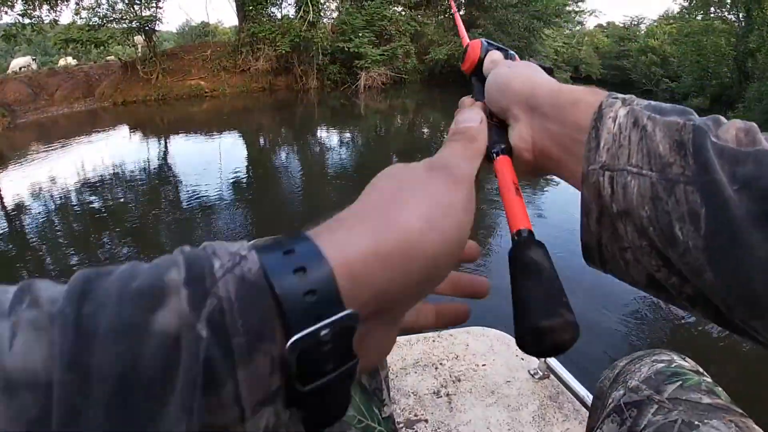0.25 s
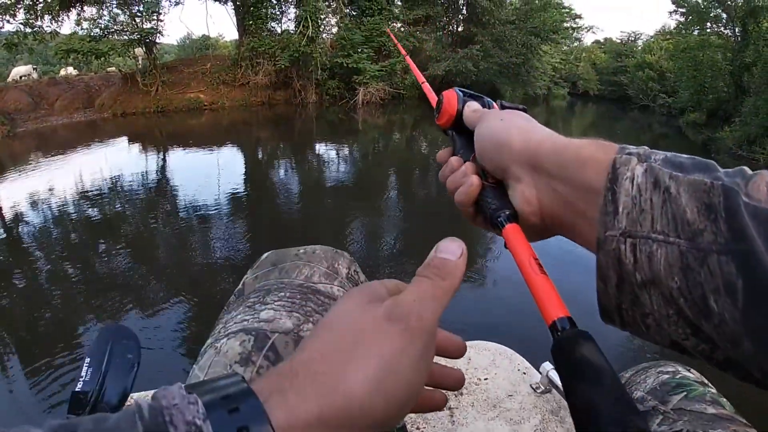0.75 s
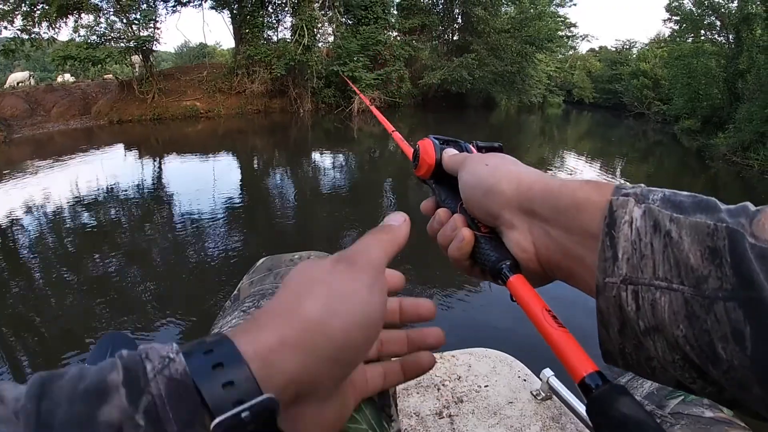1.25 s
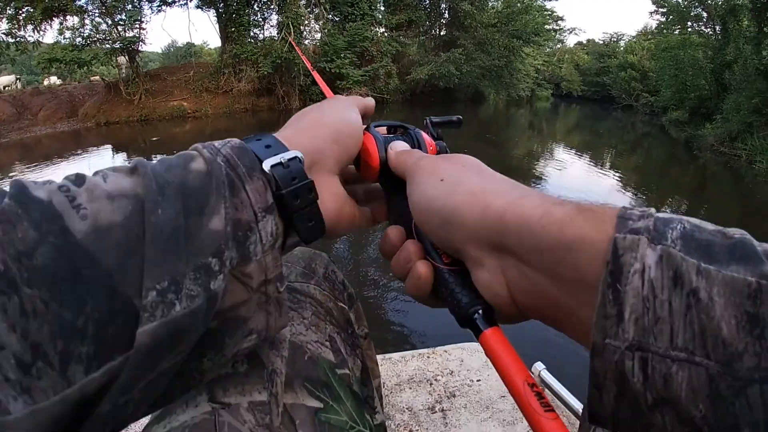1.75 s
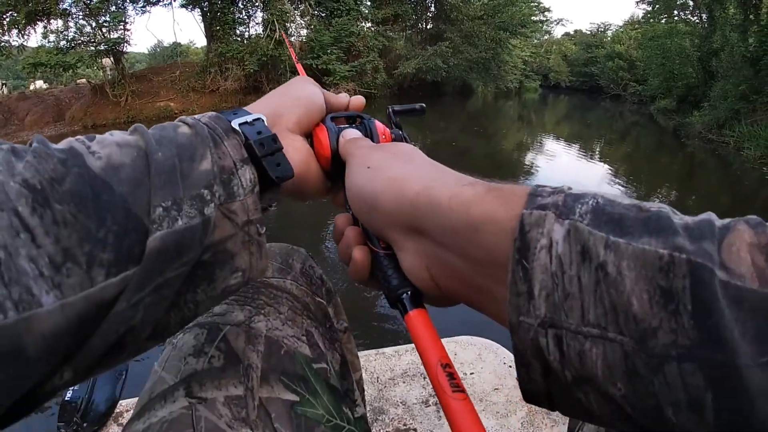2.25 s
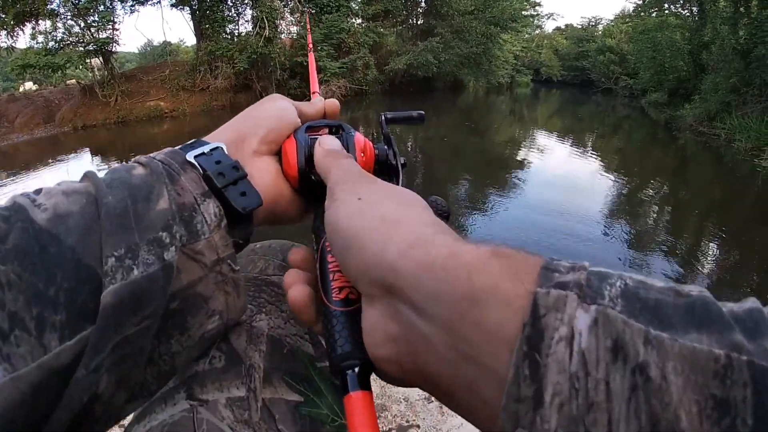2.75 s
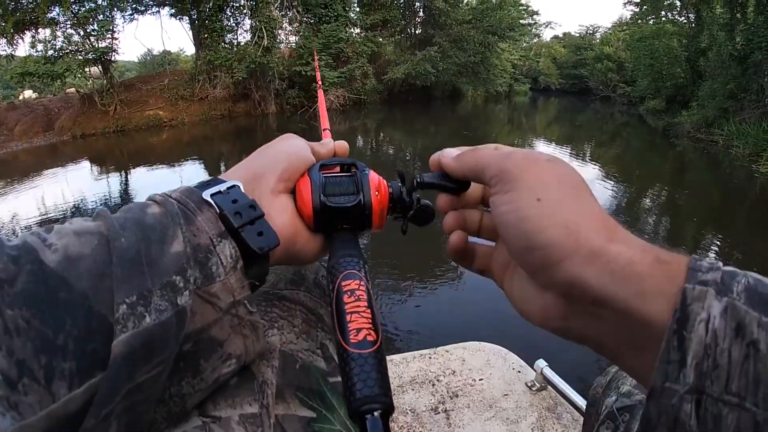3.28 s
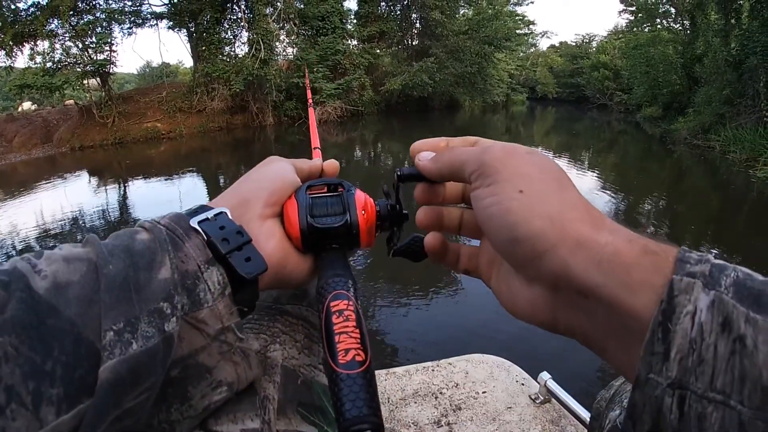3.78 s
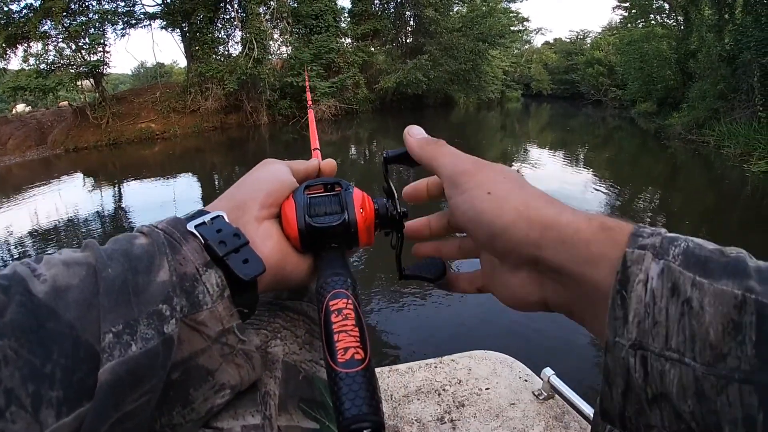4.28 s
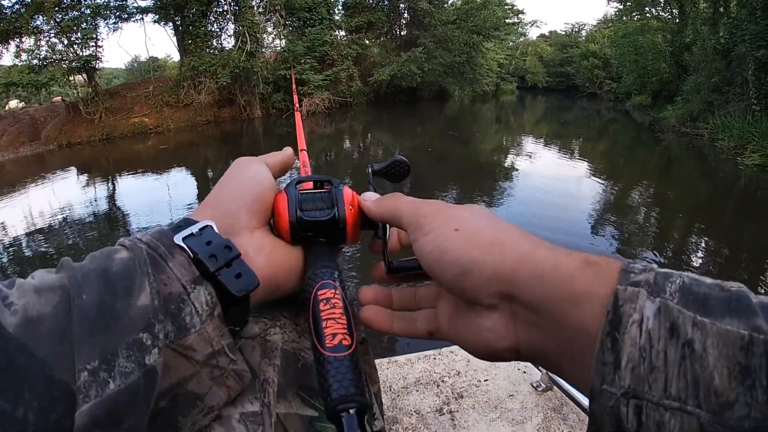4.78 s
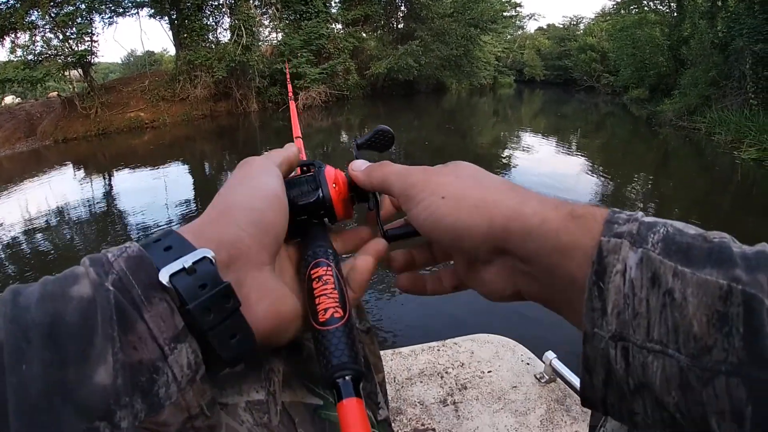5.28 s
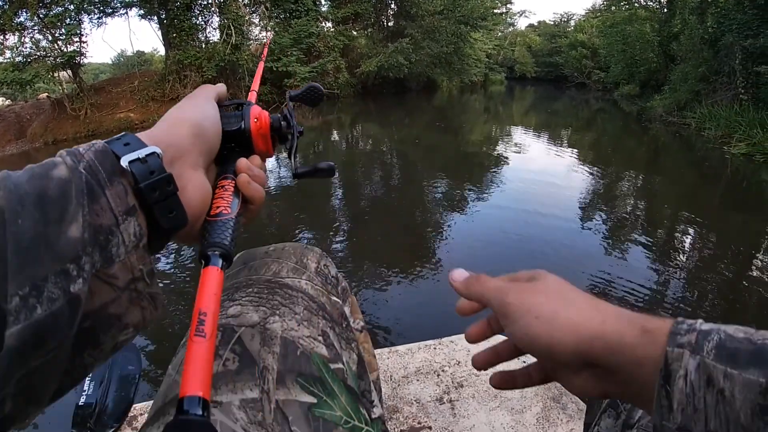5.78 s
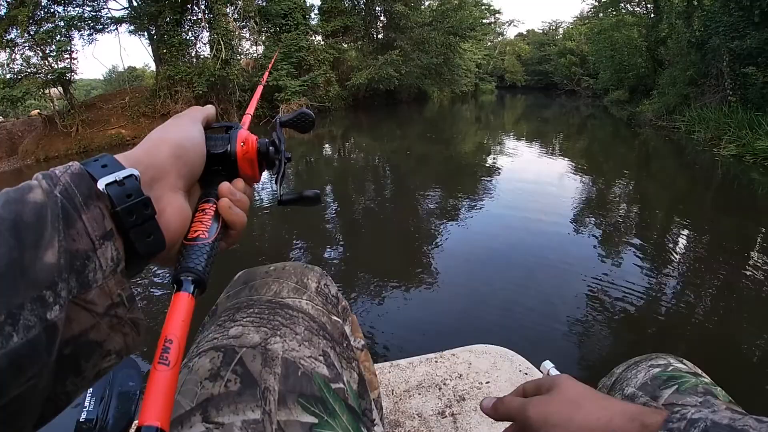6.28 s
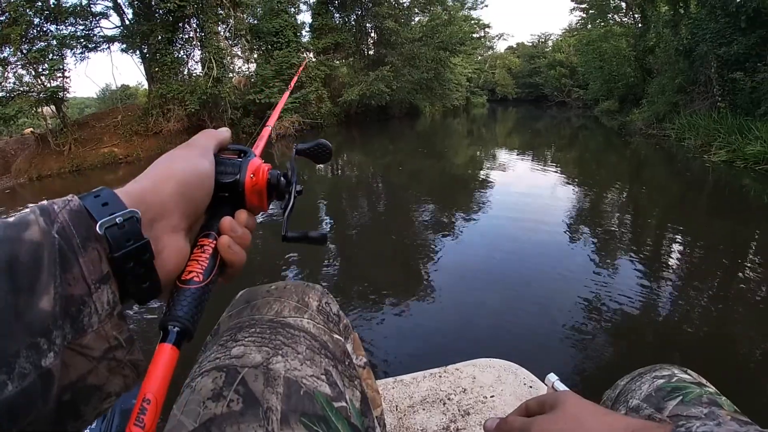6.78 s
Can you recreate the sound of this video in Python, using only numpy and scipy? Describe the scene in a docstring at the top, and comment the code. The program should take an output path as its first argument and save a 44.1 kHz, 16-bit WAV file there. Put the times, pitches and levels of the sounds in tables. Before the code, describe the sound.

A close, body-worn microphone on a small boat at a wooded pond. From 0 s line rushes off the reel in a bright, surging hiss, strongest in the first 0.15 s; the spool's whirr and whine glide down, swell into a fluttering shudder near 0.93 s and stop by 1.13 s. A light knock and short watery plop land at about 1.06 s with a faint bank echo. Soft sleeve rustles and low bumps follow, a heavier thump at 2.6 s. At 3.15 s the reel snaps with a sharp, damped metallic clack, then a cloth swish. Sparse taps come at 4.08, 5.13, 5.4 and 5.93 s. Insects hiss high throughout with a chirping cricket; far engines hum, rising and sagging, from 1.2 s. Faint slurred whistles and two rough squeaks pass at 2-4.4 s. From 5.7 s a wren rolls curved whistles six times a second, echoing until the end.

```python
"""A wooded pond, from a small boat: an angler casts, the spool whirs down as line hisses out, and the lure plops in.
Shaped noise makes the line, gliding partials the spool, and short bursts through resonances the reel's sharp clack.
Grainy noise rustles as sleeves, filtered bursts knock on the rod, and low noise thuds as the body bumps its microphone.
Insects hiss, far slurs and two rough squeaks sound, and a wren starts its rolling song: curved sines with tree echoes.
Two far engines hum: one rises and falls as sines, one drones as narrow noise."""
import sys
import numpy as np
from scipy import signal
from scipy.fft import rfft, irfft, next_fast_len
from scipy.io import wavfile
from scipy.ndimage import map_coordinates

SR = 44100
rng = np.random.default_rng(int(sys.argv[2]) if len(sys.argv) > 2 else 0)


def bounce(signal):
    """Save signal as a 16-bit WAV file at the path given by the first command-line argument."""
    frames = np.transpose(np.atleast_2d(signal))
    limited = np.clip(frames, -1, 1)
    pcm = np.round(limited * 32767).astype(np.int16)
    wavfile.write(sys.argv[1], SR, pcm)


N = 310023
TIME = np.arange(N) / SR
# the slowing spool shudders more and more, then calms and stops
SHUDDER_S, SHUDDER_RISE_S, SHUDDER_FALL_S, STOP_S = 0.935, 0.12, 0.049, 1.133


def cast(flutter=0.042, slap_db=1.33, high_ring_db=3, spray_patch_db=2):
    """Line leaves the slowing spool in surges, fluttering once a turn; the reel whines and the spool whirrs."""
    # the spool slows as the lure flies: t/s, speed/(turns per s)
    spool_speed = [(0, 159), (.1, 153.5), (.25, 142), (.4, 128), (.5, 116), (.6, 110), (.7, 103.3),
                   (.8, 91), (.855, 83.6), (.9, 81.4), (1.0, 66.5), (1.08, 56)]
    # hiss of the running line: f/Hz, level/dB
    line_colour = [(150, -29), (250, -11), (620, -20), (784, -3), (967, -29), (1300, -6), (1520, -3.5),
                   (1730, -12.5), (2050, 3.5), (2280, 3.5), (2650, -1.5), (3130, 2.5), (3750, -3.5),
                   (4500, -5), (5600, 3), (6300, -5.5), (6800, -5), (7500, -8), (9100, -23), (15400, -120)]
    # high spray above it: f/Hz, level/dB
    spray_colour = [(5000, -6.5), (6800, -12), (8000, 0.5), (9400, -9.5), (10500, -6), (11500, -18),
                    (12200, -15), (15000, -24), (16500, -50)]
    # coils whip through the guides: middle t/s, length/s, line boost/dB, spray boost/dB
    surges = [(0.042, 0.056, 5.5, 6.5), (0.137, 0.035, 4, 10.5), (0.27, 0.034, 0, 9), (0.32, 0.019, 4, 9.5),
              (.391, 0.032, 1, 12.5), (0.546, 0.077, 1, 6.5), (0.623, 0.028, 3.5, 7.5),
              (0.706, 0.056, -0.5, 5.5)]
    # one row a layer: level in free flight/dB, share of the throw's boost, boost at full shudder/dB
    line_level = (-51.5, 0.29, 8.5)
    spray_level = (-59.5, 1, 11.4)
    whine_level = (-60.5, .85, 9.5)
    # the throw pulls hard on the line, then lets it fly
    throw_s, throw_release_s, throw_boost_db = 0.17, 0.081, 13.5

    speed, = follow(spool_speed)
    throw_db = throw_boost_db * np.clip((throw_s - TIME) / throw_release_s, 0, 1)
    before = np.maximum(SHUDDER_S - TIME, 0)
    after = np.maximum(TIME - SHUDDER_S, 0)
    shudder = np.exp(-before / SHUDDER_RISE_S - after / SHUDDER_FALL_S)
    line_db, spray_db, whine_db = (
        db + share * throw_db + shudder_db * shudder
        for db, share, shudder_db in (line_level, spray_level, whine_level))
    for s, length, low_db, high_db in surges:
        surge = swell(s, length)
        line_db = line_db + low_db * surge
        spray_db = spray_db + high_db * surge
        whine_db = whine_db + 1.04 * high_db * surge

    turning = unit(1 + flutter * tone(speed)) * amp(slap_db * wander(69.8))
    line = amp(line_db) * hiss(line_colour)
    slips = colour(grains(spread_db=3.0), spray_colour)
    spray = amp(spray_db) * patchy(slips, spray_patch_db, patch_hz=500, patch_s=.025)
    whine = fuzzy(51.5 * speed * (1 + .01 * wander(45)), 520) * amp(1.8 * wander(110))
    # the whine swells as it glides through a ring of the frame
    whine = whine + amp(high_ring_db) * resonate(whine, 3400, 260)
    running = np.clip((STOP_S - TIME) / 0.11, 0, 1)
    return running * (turning * (line + spray + amp(whine_db) * whine) + whirr(speed, shudder))


def whirr(speed, shudder, flicker_db=2.0, sing_order=11, sing_hz=1300, sing_width_hz=70, sing_db=-56):
    """The spool's partials glide down through the rings of the frame; one of them sings briefly as it passes."""
    # partials, those in between on the same slope: multiple of the spool speed, level/dB
    orders = [(3, -9), (4, -4), (5, -15), (6, 0), (7, -1), (8, 0), (9, 0), (10, -9), (11, -7), (12, -8),
              (13, -16), (18, -15), (20, -7), (21, -8), (22, -4), (23, -9), (24, -4), (28, -4), (34, -10)]
    # the frame favours some pitches: f/Hz, level/dB
    frame_colour = [(300, 0), (420, -3), (520, 0), (640, -1), (770, 3), (870, -6), (980, 0), (1080, -6),
                    (1170, -2), (1290, 7), (1420, 0), (1550, 3), (1720, -5), (1850, 1), (2080, -5),
                    (2350, 5), (2600, -3), (3200, -1), (4500, -12)]
    # it sets in faintly in free flight, then grows steadily up to the shudder
    free_db, top_db, rise_db_per_s, fall_db_per_s, onset_s = -68.5, -53, 44, 230, 0.56

    out, t = np.zeros(N), TIME[TIME < STOP_S]
    n = len(t)
    rising_db = np.maximum(top_db - rise_db_per_s * np.maximum(SHUDDER_S - t, 0), free_db)
    level_db = rising_db - fall_db_per_s * np.maximum(t - SHUDDER_S, 0)
    # the spool runs nearly true until the shudder shakes it
    wobble = .003 + .028 * shudder[:n] ** 5
    hz = speed[:n] * (1 + wobble * wander(150)[:n])
    for k in range(orders[0][0], orders[-1][0] + 1):
        db = read(orders, k) + read(frame_colour, k * hz) + flicker_db * wander(60)[:n]
        out[:n] += amp(level_db + db) * tone(k * hz, rng.random())
    out *= np.minimum(TIME / onset_s, 1) ** 2
    sing_pitch = sing_order * speed
    singing = amp(sing_db) / (1 + ((sing_pitch - sing_hz) / sing_width_hz) ** 2)
    return out + singing * fuzzy(sing_pitch, 90)


def plop(splash_s=1.067, splash_db=-39, splash_t60=0.26, echo_db=-55, echo_hz=1320, echo_t60=1.7):
    """The lure lands: a light knock just before, then a few bubbles, a short splash, and a narrow echo off the banks."""
    # knock and bubbles: t/s, level/dB, f/Hz, life/s
    knock_and_bubbles = [(1.0588, -35.5, 595, 0.0034), (1.0631, -24.5, 1900, 0.00077),
                         (0.98, -39, 1000, 0.00073), (1.069, -42, 1760, 0.0027),
                         (1.0695, -40.5, 626, 0.0062), (1.069, -33.5, 3100, 0.00046),
                         (1.078, -39.5, 435, 0.0059)]
    # f/Hz, level/dB
    splash_colour = [(180, -30), (300, -11), (428, -3.5), (1470, -10.5), (1720, -3), (2690, -9.5),
                     (3180, -13), (4900, -11), (8410, -21.5), (12000, -55), (15600, -79), (22000, -120)]
    out, t = np.zeros(N), np.arange(4000) / SR
    for s, db, hz, life in knock_and_bubbles:
        pulse = t / life * np.exp(1 - t / life)
        add(out, s, amp(db) * pulse * np.sin(2 * np.pi * hz * t))
    age = np.maximum(TIME - splash_s, 0)
    splash = amp(splash_db - 60 * age / splash_t60) * np.minimum(age / 0.00091, 1)
    echo = amp(echo_db - 60 * age / echo_t60) * np.minimum(age / 0.093, 1)
    return out + splash * hiss(splash_colour) + echo * fuzzy(echo_hz, 330)


def clutch(softness_hz=12000, softer_db_per_octave=28, least_width_hz=200):
    """Each contact is a brief chatter that rings the reel's frame, kept damped by the hand; light ones are duller."""
    # the clutch snaps in: t/s, relative level/dB, burst decay/s
    contacts = [(3.1273, -32, 0.0004), (3.1324, -23.5, 0.00062), (3.1450, -35.5, 0.0012),
                (3.1503, -30.5, .0004), (3.1531, -13, 0.001), (3.1555, 3, 0.0006), (3.1574, -7, 0.0004),
                (3.1602, -17, 0.0008)]
    # resonances of the frame: f/Hz, width/Hz before the damping floor, level/dB
    frame_rings = [(540, 390, -11.5), (1445, 220, -8), (2001, 220, -6.5), (2792, 180, -2), (3220, 320, -4),
                   (4040, 220, 1), (4847, 233, 0), (5080, 270, -2.5), (5760, 300, -6.5), (6800, 200, -10.5),
                   (6910, 220, -9.5), (7200, 200, -12.5), (7810, 200, -11), (8330, 160, -10.5),
                   (8990, 150, -10.5), (12760, 800, -18.5), (14520, 1700, -23)]
    out = np.zeros(N)
    for s, db, decay in contacts:
        cutoff_hz = min(softness_hz * 2 ** (db / softer_db_per_octave), 15000)
        blow = signal.lfilter(*signal.butter(2, cutoff_hz, fs=SR), chatter(decay))
        # neighbouring resonances ring with opposite sign
        ring = sum((-1) ** k * amp(level) * resonate(blow, hz, max(width, least_width_hz))
                   for k, (hz, width, level) in enumerate(frame_rings))
        # scaled to equal energy before its level
        add(out, s - 64 / SR, amp(db) * 5 * ring / np.linalg.norm(ring))
    return out


def knocks():
    """Hand, crank and rod tap each other: band-limited contacts, dull and quickly damped."""
    # t/s, peak level/dB, centre f/Hz, spread each way/octaves, burst decay/s
    taps = [(1.522, -59, 9100, .6, .004), (2.368, -43, 2190, 0.9, 0.0032), (2.7766, -47, 394, 0.76, 0.0047),
            (3.1678, -32, 300, 0.88, 0.0046), (3.223, -39.5, 2200, 0.48, 0.0027),
            (3.3, -40, 3000, 0.68, .004), (3.6692, -52.5, 443, 0.25, 0.0057),
            (4.0763, -34, 2400, 0.46, 0.0011), (4.0767, -46, 796, 0.22, .0015),
            (4.7563, -56.5, 751, 0.63, 0.0051), (5.1337, -30, 4300, 0.42, 0.001),
            (5.341, -42.5, 606, 0.74, 0.0023), (5.402, -40, 580, 0.66, 0.0023),
            (5.919, -37, 330, 0.73, 0.0042), (5.9338, -33.5, 1190, 1, 0.0016),
            (5.9348, -33, 478, 0.41, 0.0026), (6.314, -43, 450, 0.86, 0.0074)]
    out = np.zeros(N)
    for s, db, centre, spread, decay in taps:
        edges = centre * 2. ** np.array([-spread, spread])
        tap = signal.lfilter(*signal.butter(2, edges, "bandpass", fs=SR), chatter(decay))
        add(out, s - 64 / SR, amp(db) * tap / np.abs(tap).max())
    return out


def sleeves(cloth_db=-67, grain_db=1.2, patchy_db=.8):
    """Cloth rustles in soft strokes as the arms move; bright strokes swish."""
    # a sleeve or palm slides: middle t/s, length/s, level/dB, brightness 0-1
    strokes = [(1.293, 0.17, -62.5, 0.4), (1.485, 0.22, -61, 0.2), (2.114, 0.56, -60, 0),
               (2.72, 0.14, -59.5, 0.4), (2.854, 0.12, -58.5, 0.1), (3.09, 0.08, -60.5, 0.6),
               (3.227, 0.075, -50.5, 0.5), (3.302, 0.066, -58.5, .2), (4.707, 0.13, -57.5, 0.21),
               (4.897, .14, -56.5, 0.24), (5.01, 0.08, -54, 0.5), (5.143, 0.13, -58.5, 0),
               (5.397, 0.17, -60.5, 0.6), (6.137, 1, -61.5, 0)]
    # f/Hz, level/dB
    rustle_colour = [(300, -10.5), (1200, -6), (2100, -1), (3800, 2), (5500, 0), (7800, -4.5),
                     (9500, -14.5), (12000, -27.5), (15000, -37.5)]
    # f/Hz, level/dB
    swish_colour = [(1000, -13), (3000, -5.5), (5500, -0.5), (8000, 4.5), (10000, -8.5), (13000, -20),
                    (15000, -35)]
    rub, swish = amp(cloth_db), 0
    for s, length, db, bright in strokes:
        stroke = amp(db) * swell(s, length)
        rub = rub + np.sqrt(1 - bright) * stroke
        swish = swish + np.sqrt(bright) * stroke
    rustle = rub * colour(grains(spread_db=grain_db), rustle_colour)
    return (rustle + swish * hiss(swish_colour)) * amp(patchy_db * wander(50))


def handling():
    """The moving body rumbles and thuds through the microphone it wears."""
    # the body shifts and bumps: middle t/s, length/s, rumble level/dB, thud level/dB
    bumps = [(0.047, 0.2, -34, -53), (0.178, 0.1, -48, -34), (0.335, 0.13, -41.5, -43),
             (0.673, 0.059, -32, -43.5), (1.667, 0.17, -46.5, -46.5), (1.868, 0.18, -37.5, -47.5),
             (2.084, 0.099, -30.5, -41.5), (2.427, 0.061, -34.5, -55), (2.606, 0.072, -23, -39.5),
             (2.815, 0.29, -42.5, -58), (2.954, 0.048, -41, -38), (3.073, 0.058, -36.5, -62),
             (3.253, 0.13, -40.5, -49), (3.44, 0.13, -39.5, -45), (3.631, 0.052, -30.5, -43.5),
             (4.311, 0.049, -34.5, -60.5), (4.517, 0.082, -39, -45.5), (5.026, 0.054, -35.5, -63),
             (5.275, 0.041, -35.5, -47.5), (5.567, 0.078, -44, -61), (6.236, 0.047, -56.5, -44.5),
             (6.93, 0.16, -29, -39.5)]
    # f/Hz, level/dB
    rumble_colour = [(10, -13), (22, -4.5), (38, -3), (55, -8.5), (80, -28.5), (160, -76.5), (600, -130)]
    # f/Hz, level/dB
    thud_colour = [(35, -26), (65, 2), (110, -4), (160, -9), (260, -27), (600, -60.5), (2500, -130)]
    # between bumps it sways at random, more while the hands work the reel
    busy_start_s, busy_end_s, busy_fade_s, busy_db = 1.4, 6.04, 0.23, 8
    sway_rumble_db, sway_thud_db, sway_spread_db, sways_per_s = -58, -67, 3, 11
    busy = envelope(TIME, busy_start_s, busy_end_s, busy_fade_s, busy_fade_s)
    sway_db = busy_db * busy + sway_spread_db * wander(sways_per_s)
    rumble, thud = amp(sway_rumble_db + sway_db), amp(sway_thud_db + sway_db)
    for s, length, rumble_db, thud_db in bumps:
        push = swell(s, length)
        rumble = np.hypot(rumble, amp(rumble_db) * push)
        thud = np.hypot(thud, amp(thud_db) * push)
    return rumble * hiss(rumble_colour) + thud * hiss(thud_colour)


def wren(echo_hz=3100, echo_db=-6, bend_hz=35):
    """One phrase of curved whistles repeated six times a second, ringing in the woods."""
    # phrases: t/s, tick, high note, low note and slur level/dB, pitch factors of high note, low note and slur
    phrases = [(5.7, -46, -47.5, -43.5, -33, 1.01, 0.97, 0.99),
               (5.863, -43.5, -37.5, -36, -29, 0.95, .98, 0.99),
               (6.021, -46.5, -34.5, -32.5, -30, 0.99, 0.99, .99),
               (6.179, -44.5, -34, -33.5, -30.5, 1, 0.97, 0.98),
               (6.338, -43.5, -33.5, -31.5, -30, 1.045, .99, 0.99),
               (6.501, -40, -33.5, -30.5, -29.5, 1, 1, 1), (6.668, -42.5, -33.5, -32, -31, 0.98, 1, 0.99),
               (6.835, -44.5, -33.5, -30.5, -31, 1.05, 1, 0.98)]
    # notes of a phrase: t/s, length/s, start f/Hz, end f/Hz, mid sag/Hz, attack/s, release/s, waver/Hz
    notes = [(-.004, .009, 3400, 5600, 200, .003, .002, 300), (.004, .019, 3300, 2640, 90, .005, .006, 75),
             (.03, .038, 2290, 2490, 105, .016, .006, 18), (.074, .038, 2820, 1960, -20, .008, .019, 30)]
    out = np.zeros(N)
    for start, tick_db, high_db, low_db, slur_db, high_pitch, low_pitch, slur_pitch in phrases:
        delivery = [(tick_db, 1), (high_db, high_pitch), (low_db, low_pitch), (slur_db, slur_pitch)]
        for note, (db, pitch) in zip(notes, delivery):
            s, length, start_hz, end_hz, sag_hz, attack, release, waver_hz = note
            t = np.arange(0, length, 1 / SR)
            bend = (sag_hz + bend_hz * rng.standard_normal()) * np.sin(np.pi * t / length)
            hz = np.linspace(start_hz, end_hz, len(t)) - bend + waver_hz * wander(700)[:len(t)]
            quiver_db = 1.3 * wander(300)[:len(t)]
            level = amp(db + quiver_db) * envelope(t, 0, length, attack, release)
            add(out, start + s, level * tone(pitch * hz))
    return out + amp(echo_db) * woods(resonate(out, echo_hz, 1560), gap_s=0.0043)


def insects(chorus_db=-54.5, cricket_db=-59, cricket_hz=5270):
    """A steady chorus of shaped noise, with one cricket chirping in even time within it, as a gated tone."""
    # f/Hz, level/dB
    chorus_colour = [(3000, -30.5), (4100, -15), (4600, 3.5), (5200, 0), (5700, 2.5), (6150, -14),
                     (7200, -16.5), (7900, -12), (9000, -29.5), (10500, -32), (12500, -42.5), (14000, -70)]
    beat = np.cos(2 * np.pi * (TIME - 2.97) / .21)
    cricket = np.clip(2 * beat - .8, 0, 1) * tone(cricket_hz + 25 * wander(220))
    return amp(chorus_db + 0.65 * wander(40)) * hiss(chorus_colour) + amp(cricket_db) * cricket


def engines(waver_db=2.5, waver_hz=2.2):
    """Only the firing notes of two far engines carry: one climbs under throttle and sags, one fades in and drones."""
    # pulls and eases off: start t/s, throttle off t/s, start f/Hz, top f/Hz, note level/dB, lower note level/dB
    revs = [(1.198, 2.006, 162.8, 202.3, -57.5, -65.5), (2.85, 3.76, 231, 246, -54, -61),
            (4.1, 4.98, 205, 237, -57, -55), (5.55, 6.3, 201, 233, -50, -65)]
    attack_s, release_s, sag_hz_per_s, lower_note_ratio = 0.33, 0.5, 115, .62
    drone_start_s, drone_hz, drone_db = 1.94, 202.74, -58.5
    out = amp(drone_db) * np.clip((TIME - drone_start_s) / attack_s, 0, 1) * fuzzy(drone_hz, 7)
    for start, off, start_hz, top_hz, db, lower_db in revs:
        climb = np.interp(TIME, [start, off], [start_hz, top_hz])
        sag = sag_hz_per_s * np.clip(TIME - off, 0, release_s)
        hz = climb - sag + waver_hz * wander(30.15)
        pair = amp(db) * tone(hz) + amp(lower_db) * tone(lower_note_ratio * hz)
        fade = envelope(TIME, start, off + release_s, attack_s, release_s)
        out += fade * pair * amp(waver_db * wander(24))
    return out


def far_calls(echo_db=-2, direct_db=-2.5, flicker_db=3):
    """Faint slurred whistles and two rough high squeaks, blurred by the trees."""
    # t/s, length/s, start f/Hz, end f/Hz, mid sag/Hz, waver/Hz, level/dB before the direct and echo gains
    calls = [(1.988, 0.041, 2940, 3310, 0, 40, -61), (2.037, 0.061, 4780, 3690, 119, 40, -56),
             (2.167, 0.038, 2290, 2444, 1.5, 40, -61), (2.227, 0.028, 2950, 3300, -0.5, 40, -65),
             (2.269, .062, 4790, 3590, 120.5, 60, -59.5), (2.353, 0.031, 3400, 3750, 0, 40, -68),
             (2.522, 0.054, 4700, 2980, 251, 50, -61.5), (2.662, 0.048, 6200, 7000, 1, 446, -57),
             (2.754, .05, 4230, 2950, 100.5, 50, -60), (2.907, 0.067, 6430, 6900, 0, 398, -59),
             (2.99, 0.043, 4020, 3050, -51, 50, -58), (3.49, 0.048, 4915, 3065, -750, 49.9, -58),
             (3.558, 0.031, 2980, 3520, 59, 39.9, -61), (3.666, 0.048, 5100, 2764, -750, 50, -57),
             (3.734, 0.028, 2965, 3390, 60.5, 39.9, -63.5), (3.84, 0.043, 4940, 2900, -700, 50, -62),
             (3.903, 0.029, 2944, 3320, 62.5, 39.8, -65), (4.32, 0.0404, 3080, 2960, 28, 70, -66),
             (4.376, 0.04, 2950, 3020, 30, 70, -66)]
    out = np.zeros(N)
    for s, length, start_hz, end_hz, sag_hz, waver_hz, db in calls:
        u = np.linspace(0, 1, int(length * SR))
        glide = np.geomspace(start_hz, end_hz, len(u)) - sag_hz * np.sin(np.pi * u)
        hz = glide + waver_hz * wander(400)[:len(u)]
        level = amp(db + flicker_db * wander(350)[:len(u)])
        add(out, s, level * tone(hz) * signal.windows.tukey(len(u), .7))
    return amp(direct_db) * out + amp(echo_db) * woods(out, gap_s=0.0097)


def open_air(air_db=-55):
    """Open air over the pond: low shaped noise whose level drifts slightly."""
    # f/Hz, level/dB
    air_colour = [(71, -48.5), (120, -10), (171, -2), (198, -0.5), (232, -8), (294, -12.5), (585, -27.5),
                  (719, -19), (1240, -31), (1520, -28), (2070, -36.5), (3070, -32), (4000, -45.5),
                  (5200, -70), (8800, -120)]
    return amp(air_db + 0.42 * wander(1.3)) * hiss(air_colour)


def woods(x, gap_s):
    """Scattered echoes from the trees on the banks, each band dying at its own speed."""
    # f/Hz, 60 dB decay time/s
    decay_times = [(200, 0.79), (1300, 2.5), (2600, 1.44), (5000, 1.1), (12000, 0.37)]
    taps = rng.standard_normal(SR) * (rng.random(SR) < .06)
    hz, t, z = signal.stft(taps, SR, nperseg=256)
    decay = amp(-60 * t / read(decay_times, hz)[:, None])
    onset = 1 - np.exp(-(t / gap_s) ** 2)
    tail = signal.istft(z * decay * onset, SR, nperseg=256)[1]
    return signal.fftconvolve(x, tail / np.linalg.norm(tail))[:N]


def chatter(decay):
    """A contact that rattles briefly, its spectrum flattened before a short gate; it starts 64 samples in."""
    t = (np.arange(2048) - 64) / SR
    burst = rng.standard_normal(len(t)) * (t >= 0) * np.exp(-np.abs(t) / decay)
    touching = np.interp(t, [-.0005, 0, 3 * decay, 5 * decay], [0, 1, 1, 0])
    return touching * irfft(np.exp(1j * np.angle(rfft(burst))))


def grains(spread_db):
    """Friction: a dense train of tiny slips of uneven size."""
    return rng.standard_normal(N) * amp(spread_db * wander(900))


def patchy(x, depth_db, patch_hz, patch_s):
    """Lets narrow bands flare and fade on their own, at rms 1."""
    hz, t, z = signal.stft(x, SR, nperseg=256)
    where = np.meshgrid(hz / patch_hz, t / patch_s, indexing="ij")
    field = unit(map_coordinates(rng.standard_normal((80, 800)), where, order=1, mode="wrap"))
    return unit(signal.istft(z * amp(depth_db * field), SR, nperseg=256)[1][:N])


def fuzzy(hz, width):
    """A rough, wavering tone on a pitch curve: noise through two equal resonances, rms 1."""
    return unit(resonate(resonate(rng.standard_normal(N), hz, width), hz, width))


def resonate(x, hz, width):
    """A resonance of gain 1 that may glide: shift the pitch down to zero, smooth, shift back."""
    turn = np.exp(2j * np.pi * np.cumsum(hz * np.ones(len(x))) / SR)
    r = np.exp(-np.pi * width / SR)
    return 2 * (turn * signal.lfilter([1 - r], [1, -r], x / turn + 1e-18)).real


def tone(hz, turn=0):
    """A sine on a pitch curve, rms 1, starting part of a turn in."""
    return np.sqrt(2) * np.sin(2 * np.pi * (np.cumsum(hz) / SR + turn))


def hiss(points):
    """Noise with a spectrum, rms 1."""
    return colour(rng.standard_normal(N), points)


def colour(x, points):
    """Gives x a spectrum, at rms 1."""
    size = next_fast_len(len(x))
    gain = amp(read(points, np.fft.rfftfreq(size, 1 / SR)))
    return unit(irfft(rfft(x, size) * gain, size)[:len(x)])


def wander(per_s):
    """Slow chance of rms 1, with per_s new values a second."""
    return unit(np.interp(TIME * per_s, np.arange(8000), rng.standard_normal(8000)))


def swell(middle_s, length_s):
    """A smooth rise and fall of height 1, above half height for length_s."""
    return np.exp2(-np.minimum((2 * (TIME - middle_s) / length_s) ** 2, 60))


def envelope(t, start_s, end_s, attack_s, release_s):
    """Attack, hold at 1, release."""
    return np.clip((t - start_s) / attack_s, 0, 1) * np.clip((end_s - t) / release_s, 0, 1)


def read(points, hz):
    """Reads a table on a log-frequency axis."""
    f, value = np.transpose(points)
    return np.interp(np.log(hz + 1), np.log(f + 1), value)


def follow(rows):
    """Each column of a curve table at every sample."""
    s, *columns = np.transpose(rows)
    return [np.interp(TIME, s, c) for c in columns]


def add(mix, s, sound):
    """Mixes a sound in at time s."""
    part = mix[max(round(s * SR), 0):][:len(sound)]
    part += sound[:len(part)]


def amp(db):
    """Decibels to gain."""
    return 10 ** (np.asarray(db) / 20)


def unit(x):
    """Scales to rms 1."""
    return x / np.sqrt(np.mean(x ** 2) + 1e-20)


def scene():
    """Everything reaches both channels alike."""
    angler = cast() + plop() + clutch() + knocks() + sleeves() + handling()
    background = wren() + insects() + engines() + far_calls() + open_air()
    mix = angler + background
    return np.array([mix, mix])


def record(dry, edge_hz=16400):
    """Peaks beyond full scale overload the input; then the band limit."""
    band_limit = signal.firwin(511, edge_hz, window=("kaiser", 9), fs=SR)
    return signal.oaconvolve(np.clip(dry, -1, 1), band_limit[None], "same")


dry = scene()
out = record(dry)
bounce(out)
```